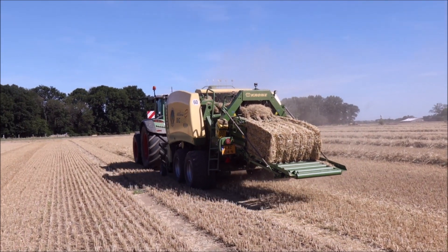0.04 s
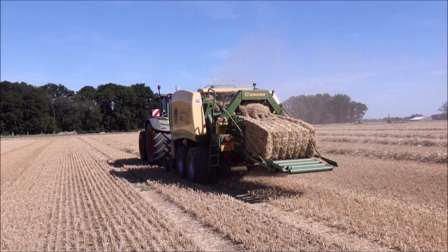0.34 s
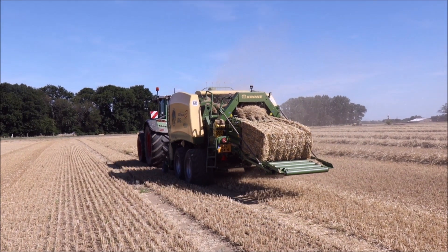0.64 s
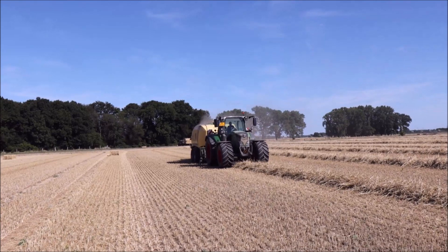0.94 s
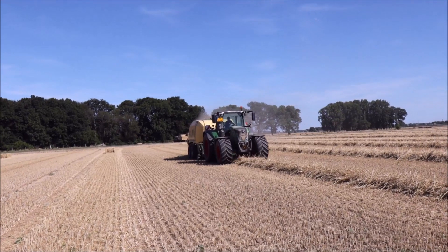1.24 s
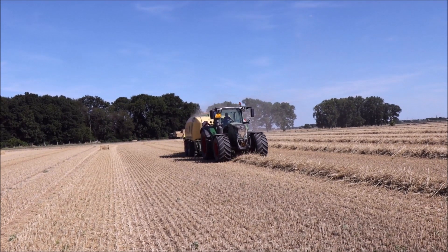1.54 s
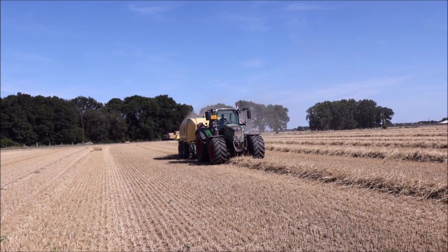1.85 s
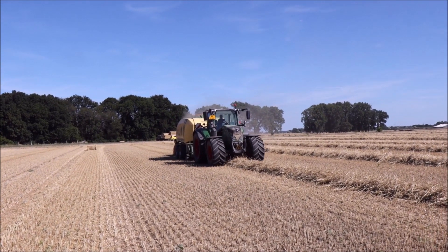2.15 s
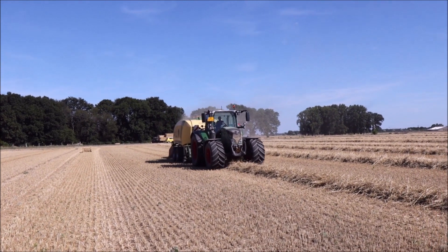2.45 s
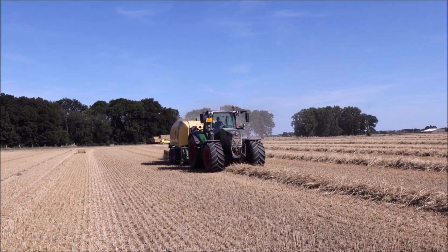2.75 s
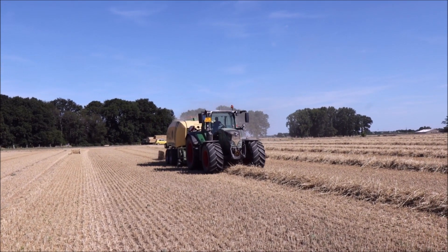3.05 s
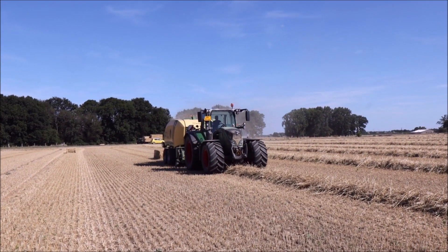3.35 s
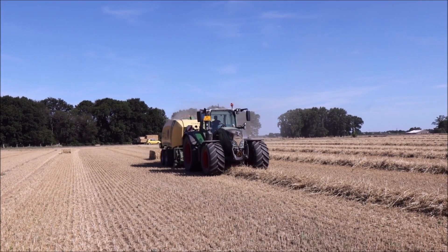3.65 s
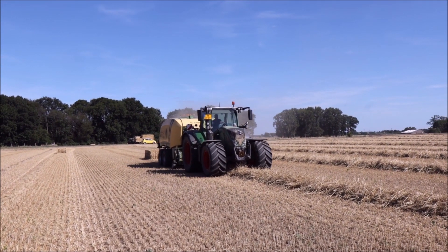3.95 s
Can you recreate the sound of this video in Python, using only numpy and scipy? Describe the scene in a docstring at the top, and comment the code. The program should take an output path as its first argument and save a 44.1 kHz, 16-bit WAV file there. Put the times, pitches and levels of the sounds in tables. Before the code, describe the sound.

A straw baler thuds and squeals, then the tractor towing it runs with a steady roar.

```python
"""A big square baler rumbles, thuds, squeals and chirps, heard from behind for half a second.
After a short silence, the tractor pulling it over stubble is heard from the front, in a light wind.
The diesel roars and a gear whines, sagging in pitch as each plunger stroke loads the shaft,
while the pickup rattles its chains and rustles through dry straw."""
import sys
import numpy as np
from scipy.fft import rfft, irfft, next_fast_len
from scipy.io import wavfile
from scipy.ndimage import map_coordinates

SR = 44100
rng = np.random.default_rng(int(sys.argv[2]) if len(sys.argv) > 2 else 0)


def log_audio(samples):
    """Write samples as a 16-bit WAV file to the path given in sys.argv[1]."""
    # one column per channel
    frames = np.atleast_2d(samples).T
    # limit to full scale, then quantise
    limited = np.clip(frames, -1, 1)
    pcm = np.round(limited * 32767).astype(np.int16)
    wavfile.write(sys.argv[1], SR, pcm)


N = 176400
TOP_HZ = 15750


def amp(db):
    """Decibels to gain."""
    return 10 ** (np.asarray(db) / 20)


def unit(x):
    """x at rms 1."""
    return x / np.sqrt(np.mean(x ** 2) + 1e-20)


def clock():
    """Sample times in s."""
    return np.arange(N) / SR


def curves(rows):
    """Per-sample curve for each column after time_s."""
    time_s, *columns = np.transpose(rows)
    return [np.interp(clock(), time_s, column) for column in columns]


def wobble(knots_per_s):
    """Smooth random curve, rms near 1."""
    return map_coordinates(rng.standard_normal(4096), [clock() * knots_per_s], mode="wrap")


def filtered(x, response):
    """x filtered by the gain response(hz)."""
    size = next_fast_len(N + SR // 2)
    return irfft(rfft(x, size) * response(np.fft.rfftfreq(size, 1 / SR)), size)[:N]


def noise(colour):
    """Noise of rms 1; colour rows: freq_hz, relative density_db."""
    freq_hz, density_db = np.transpose(colour)
    white = rng.standard_normal(N)
    return unit(filtered(white, lambda hz: amp(np.interp(np.log(hz + 1), np.log(freq_hz), density_db))))


def tone(turns):
    """Sine of rms 1."""
    return np.sqrt(2) * np.sin(2 * np.pi * turns)


def grains(rate_per_s, centre_hz, log_spread, decay_cycles, scatter_db=2.5):
    """Tiny impacts: damped rings of random time, pitch and strength; rms 1."""
    count, offsets = 4000, np.arange(300)
    gaps, strengths = rng.exponential(size=(2, count))
    starts = (np.cumsum(gaps) * SR / rate_per_s).astype(int)
    pitch_hz = np.minimum(centre_hz * np.exp(log_spread * rng.standard_normal(count)), TOP_HZ)
    turns = pitch_hz[:, None] * offsets / SR
    envelope = np.exp(-turns / decay_cycles) * (1 - np.exp(-2 * turns))
    rings = amp(scatter_db * np.minimum(strengths, 4))[:, None] * envelope * tone(turns)
    index = np.minimum(starts[:, None] + offsets, N)
    return unit(np.bincount(index.ravel(), rings.ravel(), N + 1)[:N])


def wind():
    """Low rumble of wind and machine, uneven with the gusts."""
    gusts = [(.76, -25.5), (1.15, -28.5), (1.6, -29), (2.3, -29), (2.6, -30.5), (2.8, -29.5), (2.95, -28),
             (3.3, -27.5), (3.65, -30), (4, -31)]  # gust strength: time_s, level_db
    colour = [(15, -35), (28, -12), (38, -17), (55, -11), (75, -6.5), (100, 0.5), (140, 3.5), (175, 1),
              (215, -0.5), (320, -17), (900, -47)]  # rumble spectrum: freq_hz, density_db
    gust_db, = curves(gusts)
    return amp(gust_db + 1.4 * wobble(13)) * noise(colour)


def exhaust():
    """The pipe resonates in a narrow, rough drone."""
    levels = [(.76, -33), (1.2, -31), (1.9, -31), (2.4, -34), (3.3, -33), (4, -42)]  # drone: time_s, level_db
    resonance = [(160, -47), (205, -14), (222, 2.5), (243, 0.5), (262, -6), (330, -49.5)]  # pipe resonance: freq_hz, density_db
    drone_db, = curves(levels)
    return amp(drone_db) * noise(resonance)


def straw_wads():
    """Thick wads of straw swish into the pickup."""
    wads = [(2.64, -43), (2.745, -38), (2.865, -37.5), (2.935, -39), (2.992, -32), (3.045, -39),
            (3.095, -41), (3.135, -38.5)]  # swishes: peak_s, level_db
    colour = [(5000, -30), (6800, -10), (7400, 1), (8300, 5), (9200, -6), (11500, -17), (15500, -32)]  # swish spectrum: freq_hz, density_db
    attack_s, decay_s = .0052, .037
    t = clock()
    envelope = sum(amp(db) * np.exp(-np.maximum((peak_s - t) / attack_s, (t - peak_s) / decay_s))
                   for peak_s, db in wads)
    return envelope * noise(colour)


def pickup():
    """Dry straw hisses and snaps in the tines, chaff fizzes, chains rattle."""
    straw = [(.77, -42.5), (1.05, -39.5), (1.4, -37), (1.8, -40), (2.02, -37.5), (2.45, -40), (2.9, -42),
             (3.3, -39), (3.7, -36.5), (4, -36.5)]  # straw hiss: time_s, gain_db
    straw_colour = [(2000, -22), (5200, -1), (6050, -10.5), (7000, -3.5), (8100, 0.5), (9200, -13.5),
                    (11500, -28), (15500, -40)]  # hiss spectrum: freq_hz, density_db
    chaff = [(.77, -48), (1.1, -46), (1.45, -44), (1.8, -47.5), (2.05, -44), (2.45, -46), (2.8, -47),
             (2.96, -50), (3.02, -42), (3.13, -48.5), (3.4, -45.5), (4, -41.5)]  # chaff fizz, growing as the tractor nears: time_s, level_db
    chaff_colour = [(6000, -23), (9000, 1.5), (11300, 0), (13000, -7), (15500, -17)]  # fizz spectrum: freq_hz, density_db
    (straw_db,), (chaff_db,) = curves(straw), curves(chaff)
    flutter_db = 1.1 * wobble(45) + 1.1 * wobble(500)
    hiss = amp(straw_db + 1.5 + flutter_db) * noise(straw_colour)
    fizz = amp(chaff_db + flutter_db + wobble(60)) * noise(chaff_colour)
    rattle = amp(-32.5) * grains(rate_per_s=420, centre_hz=1520, log_spread=.392, decay_cycles=1.8)
    snaps = amp(-45.5) * grains(rate_per_s=500, centre_hz=3790, log_spread=.15, decay_cycles=4)
    return hiss + fizz + rattle + snaps


def bearing_chirp():
    """A dry bearing gives one short, clean chirp."""
    partials = [(1, -2.5), (3, -24)]  # chirp partials: harmonic, relative_db
    peak_s, pitch_hz, gain_db, rise_s = .475, 3830, -22, .005
    t = clock() - peak_s
    envelope = np.exp(-(t / rise_s) ** 2)
    return envelope * sum(amp(gain_db + db) * tone(k * pitch_hz * t) for k, db in partials)


def plunger_thuds():
    """The plunger hits the bale; packed straw damps each knock within a few cycles."""
    knocks = [(.205, 111.8, -14.5), (.248, 200, -11), (.295, 225, -15.5)]  # frame knocks: start_s, pitch_hz, gain_db
    attack_s, decay_s = .0066, .014
    thuds = np.zeros(N)
    for start_s, pitch_hz, gain_db in knocks:
        t = np.maximum(clock() - start_s, 0)
        envelope = (1 - np.exp(-t / attack_s)) * np.exp(-t / decay_s)
        thuds += amp(gain_db) * envelope * tone(pitch_hz * t + .05 * wobble(80))
    return thuds


def chamber_squeal():
    """Straw rubs on steel: a clear squeal with a rough rasp on its higher partials."""
    squeal = [(0, 633, -33, -34), (.08, 637, -29, -37), (.155, 639, -33, -36), (.195, 640, -24.5, -27.5),
              (.23, 640, -27, -35), (.28, 640, -27, -31), (.33, 639, -37, -36), (.38, 634, -46, -47),
              (.42, 640, -41, -34.5), (.47, 643, -39, -36.5)]  # friction tone: time_s, fundamental_hz, clear_db, rasp_db
    clear_partials = [(2, -6.5), (3, 0)]  # clear part: harmonic, relative_db
    rasp_partials = [(4, -0.5), (7, -6.5)]  # rough part: harmonic, relative_db
    fundamental_hz, clear_db, rasp_db = curves(squeal)
    turns = np.cumsum(fundamental_hz + 1.5 * wobble(60)) / SR
    clear = sum(amp(clear_db + db + 1.8 * wobble(90)) * tone(k * turns + .079 * wobble(150))
                for k, db in clear_partials)
    rasp = sum(amp(rasp_db + db + 2.2 * wobble(120)) * tone(k * (turns + .03 * wobble(130)))
               for k, db in rasp_partials)
    return clear + rasp


def bale_chamber():
    """The plunger drives the bale along its chamber; four noise bands swell and ease."""
    levels = [(0, -24.5, -22.5, -29, -40), (.11, -21, -21, -26.5, -41.5), (.19, -20, -20.5, -29.5, -39.5),
              (.27, -19.5, -23, -27, -37), (.33, -20.5, -23.5, -28, -39), (.39, -21.5, -21.5, -32.5, -39.5),
              (.47, -21.5, -26, -31, -38.5)]  # baler from behind: time_s, rumble_db, clatter_db, scrape_db, hiss_db
    # band spectra: freq_hz, density_db
    rumble_colour = [(15, -39.5), (30, -23.5), (60, -3.5), (100, -1.5), (175, 1), (350, -2), (450, -8),
                     (900, -50)]
    clatter_colour = [(200, -15), (420, -4), (600, -1), (870, -5), (1100, -6.5), (1300, -6.5), (1550, -12),
                      (1850, -11), (2200, -20), (5000, -46)]
    scrape_colour = [(1200, -20.5), (2100, -0.5), (2450, 3.5), (2750, 2), (3100, 2), (3920, -3.5),
                     (4150, 0), (4550, -3), (5100, -4), (5900, -20), (9000, -38)]
    hiss_colour = [(3000, -15), (6000, -2.5), (7900, 1.5), (9300, -4.5), (11500, -6.5), (15500, -21)]
    rumble_db, clatter_db, scrape_db, hiss_db = curves(levels)
    return (amp(rumble_db + wobble(40)) * noise(rumble_colour)
            + amp(clatter_db + .99 * wobble(250)) * noise(clatter_colour)
            + amp(scrape_db + .59 * wobble(300)) * noise(scrape_colour)
            + amp(hiss_db + 1.6 * wobble(300)) * noise(hiss_colour))


def shaft_turns():
    """Crankshaft angle: the shaft slows as the plunger packs the straw, then recovers."""
    unloaded_hz, sag_share = 31.7, .038
    stroke_s, period_s, load_s, recover_s = 1.72, 1.335, .125, .42
    since_s = clock() - (stroke_s + period_s * np.arange(-1, 3)[:, None])
    loading = np.exp(-(since_s / load_s) ** 2)
    recovering = np.exp(-abs(since_s) / recover_s)
    load = np.where(since_s < 0, loading, recovering).sum(0)
    return np.cumsum(unloaded_hz * (1 - sag_share * load)) / SR


def tractor():
    """Gear whine and engine tones follow the shaft; the roar throbs with the firings."""
    whine_levels = [(.76, -23), (1.35, -22), (1.65, -24), (1.87, -22), (2.35, -22), (2.7, -23), (3.1, -28),
                    (3.45, -23.5), (3.7, -24), (4, -27)]  # gear whine: time_s, level_db
    orders = [(2, -44.5), (3, -39), (7, -41), (8, -42), (26, -42.5), (39, -41.5)]  # engine tones: shaft_multiple, level_db
    roar_levels = [(.77, -20.5), (1.35, -19.5), (1.65, -20), (2.0, -18.5), (2.5, -20), (3.1, -19.5),
                   (3.45, -19.5), (3.75, -18.5), (4, -18.5)]  # machine roar from the front: time_s, gain_db
    roar_colour = [(100, -32), (190, -8.5), (275, -2), (335, 1.5), (440, -4), (490, 0), (570, -1.5),
                   (720, 0), (900, -3.5), (1240, -4), (1500, -7), (1900, -8.5), (2150, -11.5),
                   (2800, -12.5), (3150, -16.5), (4200, -17.5), (5100, -22), (5900, -40.5), (8000, -58),
                   (15000, -70)]  # roar spectrum: freq_hz, density_db
    gear_teeth, firings_per_turn, throb_share = 13, 3, .07
    turns = shaft_turns()
    (whine_db,), (roar_db,) = curves(whine_levels), curves(roar_levels)
    whine = amp(whine_db + wobble(16)) * tone(gear_teeth * turns + .04 * wobble(35))
    tones = sum(amp(db + 2.8 * wobble(7)) * tone(k * turns + .089 * wobble(15)) for k, db in orders)
    throb = unit(1 + throb_share * np.sin(2 * np.pi * firings_per_turn * turns))
    roar = amp(roar_db + 1.36 + .26 * wobble(12)) * throb * noise(roar_colour)
    return whine + tones + roar


def scene():
    """Behind the baler, silence, then in front of the tractor."""
    rear_end_s, front_start_s = .478, .7603
    rear = bale_chamber() + plunger_thuds() + chamber_squeal() + bearing_chirp()
    front = tractor() + exhaust() + pickup() + straw_wads() + wind()
    t = clock()
    return ((t < rear_end_s) * rear + (t > front_start_s) * front)[None]


def record(dry):
    """Steep low-pass at TOP_HZ."""
    edge_hz = 50
    return filtered(dry[0], lambda hz: .5 - .5 * np.tanh((hz - TOP_HZ) / edge_hz))[None]


dry = scene()
out = record(dry)
log_audio(out)
```